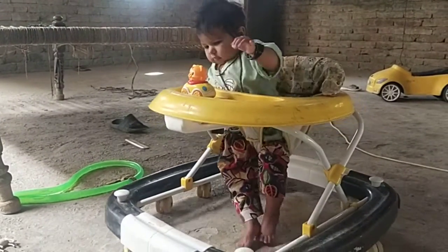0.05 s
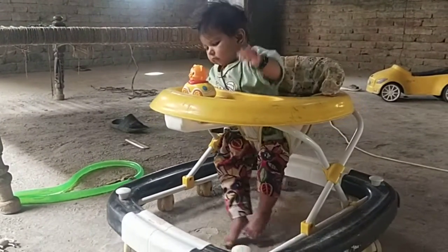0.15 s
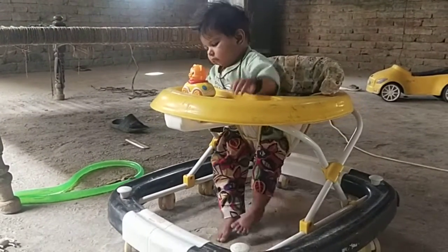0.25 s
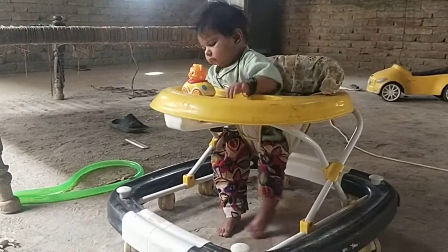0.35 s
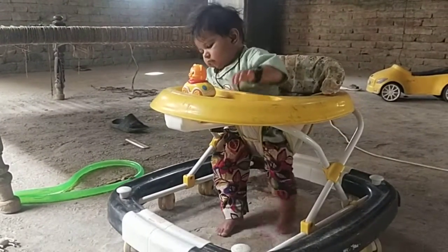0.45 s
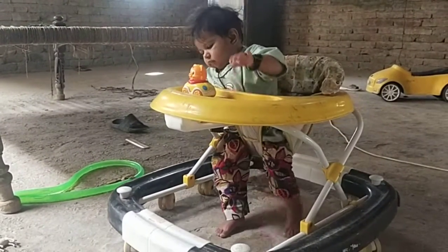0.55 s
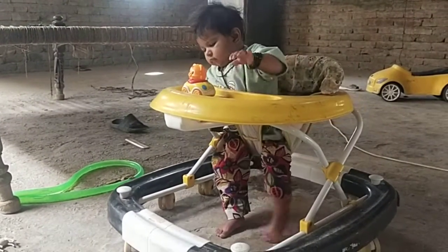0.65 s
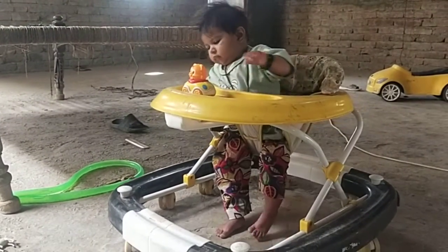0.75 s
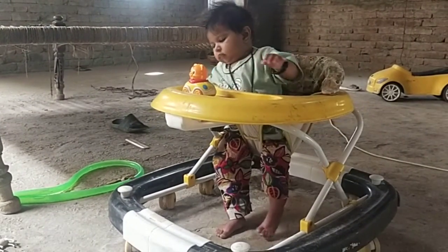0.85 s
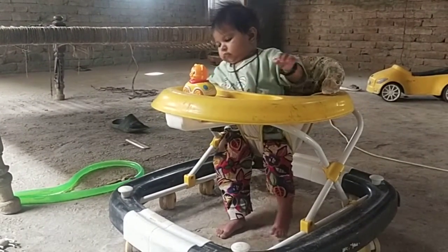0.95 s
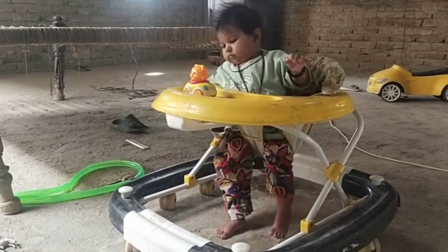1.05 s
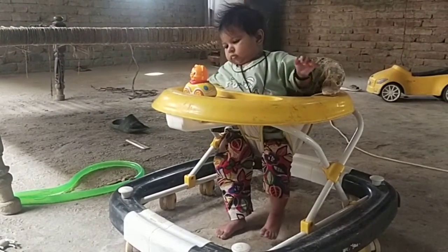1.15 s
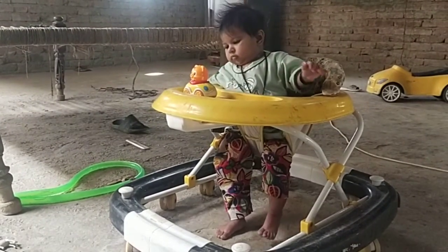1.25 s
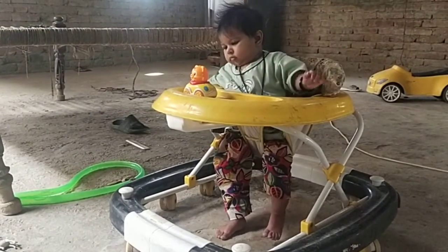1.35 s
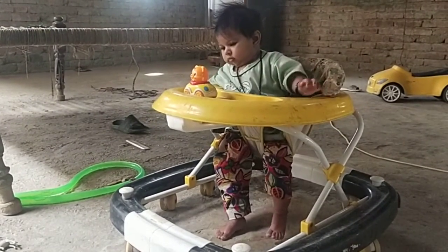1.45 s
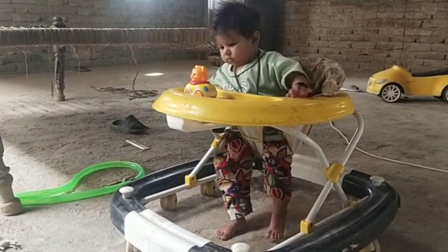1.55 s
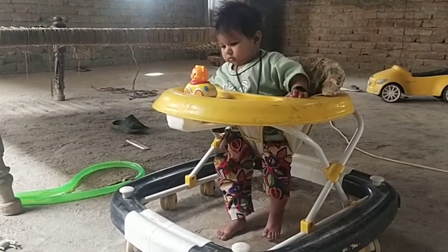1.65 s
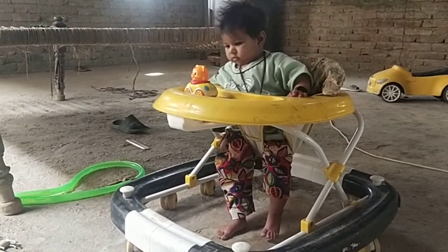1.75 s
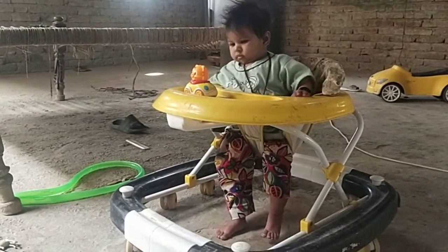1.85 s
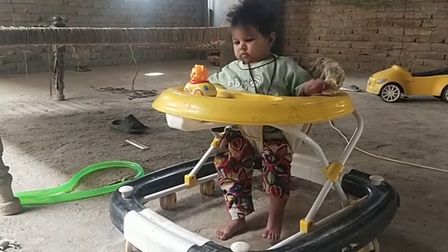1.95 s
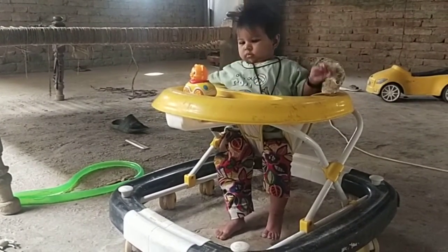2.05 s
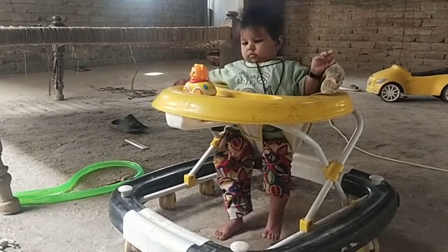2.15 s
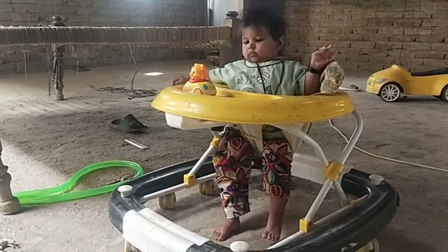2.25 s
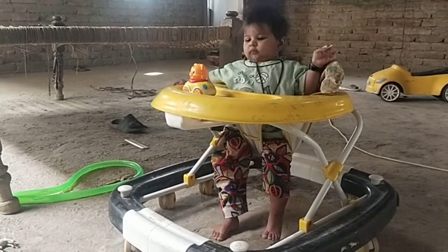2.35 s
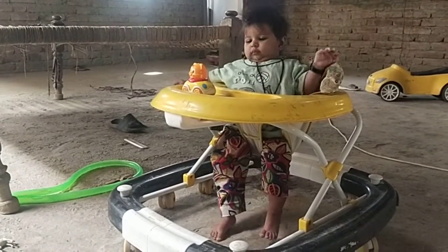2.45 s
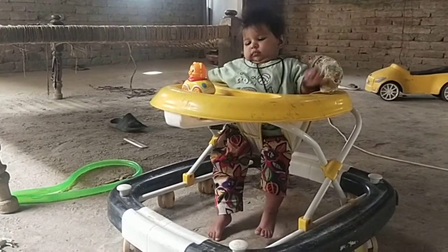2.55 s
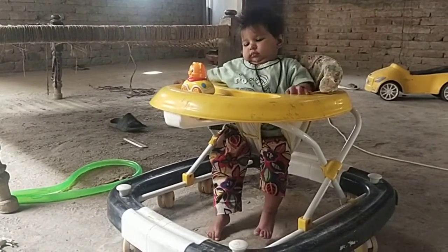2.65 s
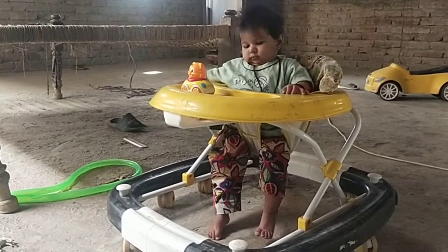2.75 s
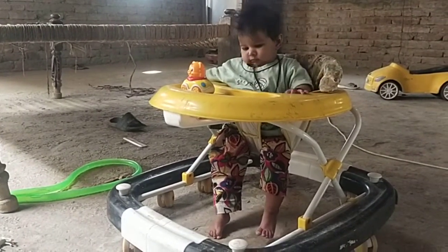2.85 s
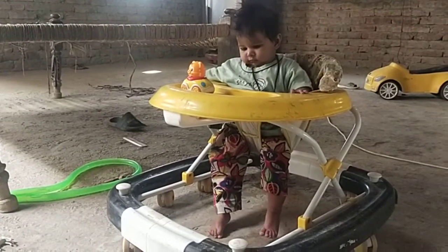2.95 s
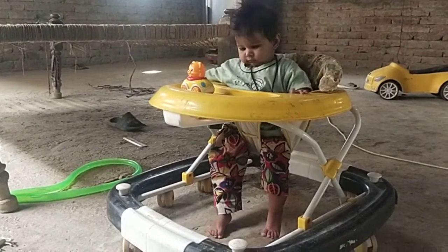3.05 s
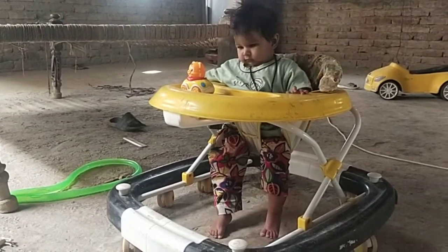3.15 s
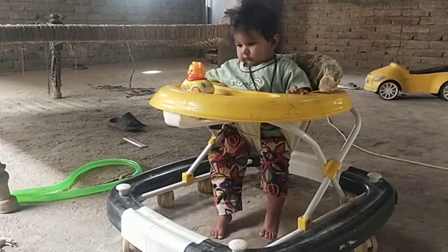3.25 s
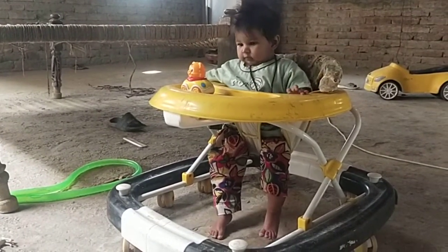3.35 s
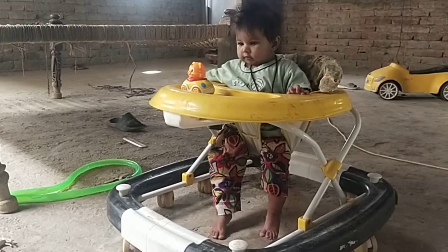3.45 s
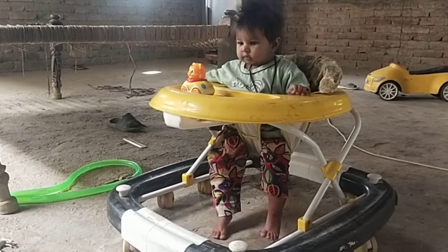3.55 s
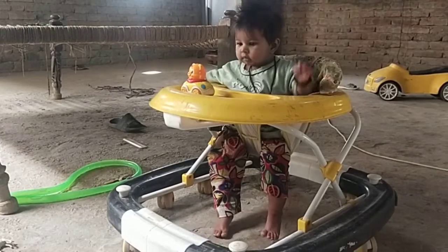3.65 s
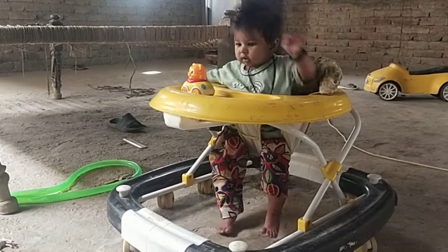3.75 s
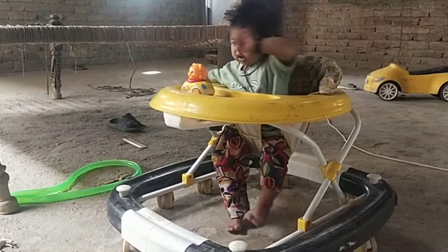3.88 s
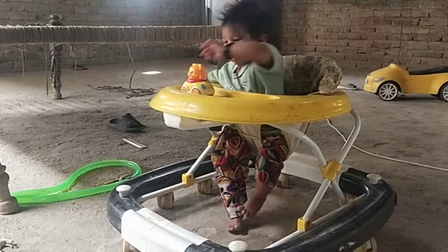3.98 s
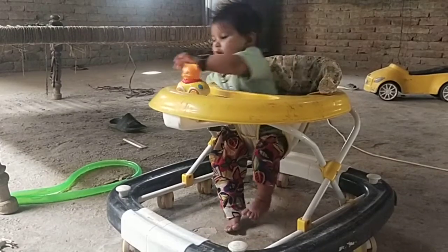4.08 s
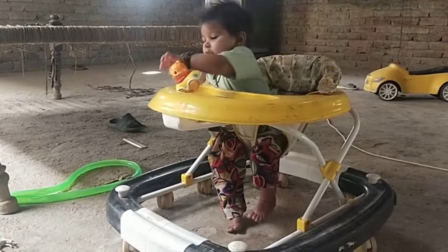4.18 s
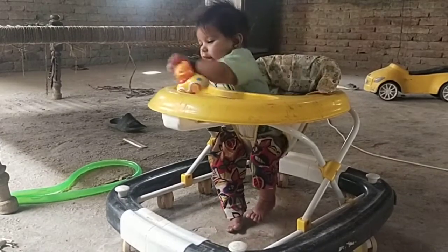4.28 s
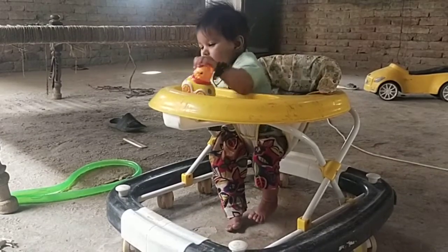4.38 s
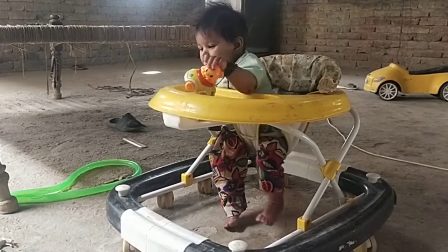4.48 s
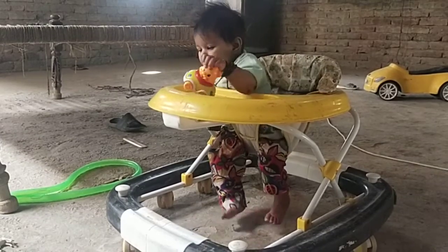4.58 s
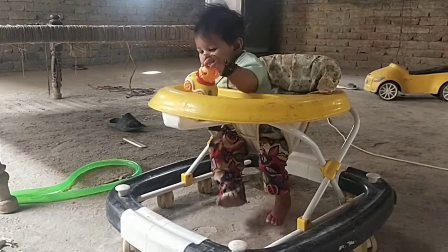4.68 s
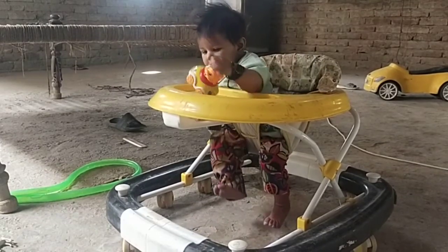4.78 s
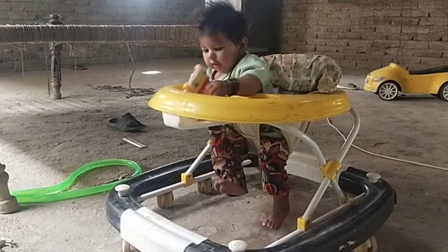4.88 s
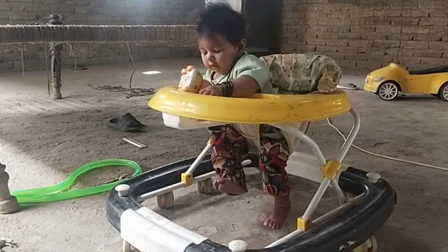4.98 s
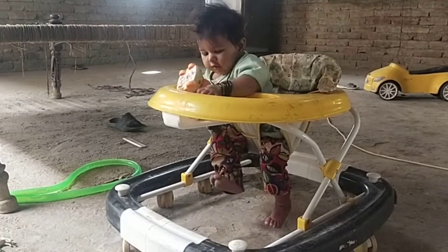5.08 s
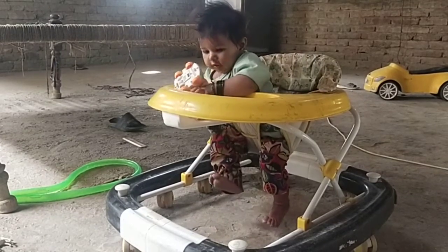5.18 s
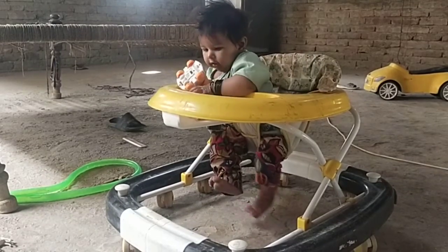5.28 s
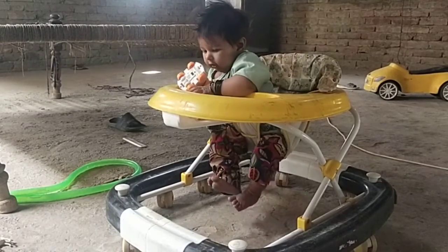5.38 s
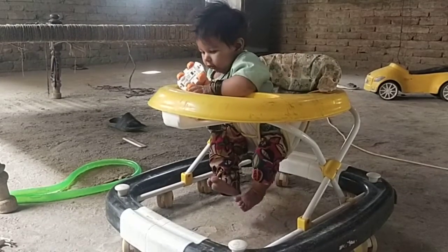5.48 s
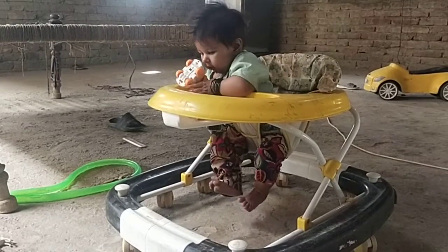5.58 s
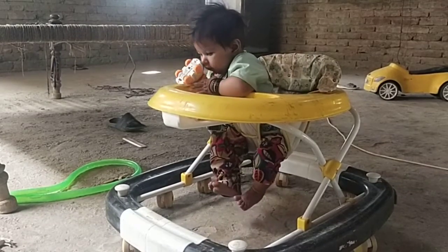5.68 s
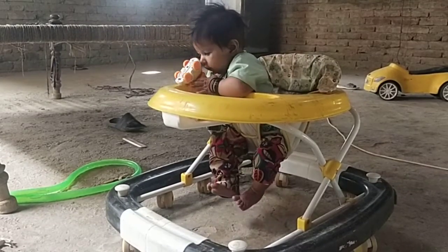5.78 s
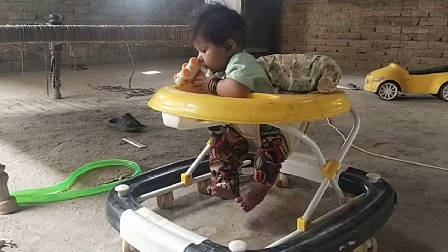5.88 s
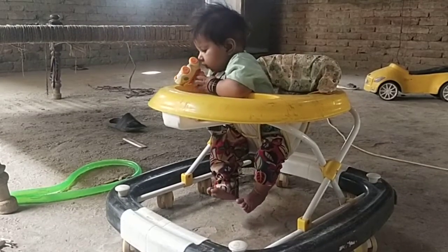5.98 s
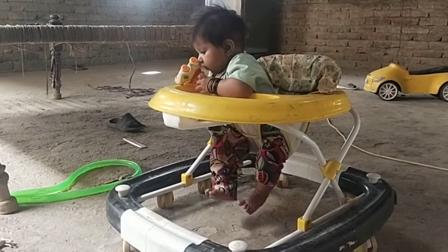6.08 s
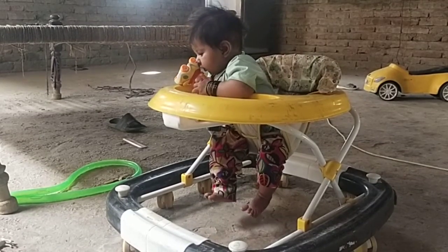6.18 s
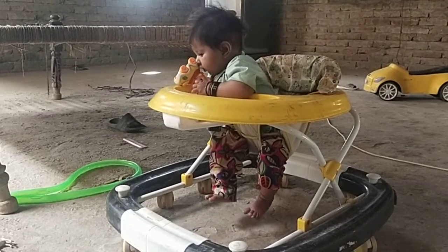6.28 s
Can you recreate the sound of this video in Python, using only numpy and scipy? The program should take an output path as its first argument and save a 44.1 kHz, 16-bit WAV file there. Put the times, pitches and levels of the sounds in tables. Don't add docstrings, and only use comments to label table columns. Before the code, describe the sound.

A small hollow plastic toy clacks and rattles on a hard plastic tray in an echoing brick hall, over faint machine drone and a distant bird trill.

```python
import sys
import numpy as np
from scipy import signal
from scipy.fft import rfft, irfft, next_fast_len
from scipy.io import wavfile
from scipy.ndimage import uniform_filter1d, map_coordinates

SR = 44100
rng = np.random.default_rng(int(sys.argv[2]) if len(sys.argv) > 2 else 0)


def field_ratio(decibels):
    return 10 ** (np.asarray(decibels, dtype=float) / 20)


def waveform_to_disk(signal):
    frames = np.transpose(np.atleast_2d(signal))
    scaled = np.clip(frames, -1, 1) * 32767
    samples = np.round(scaled).astype(np.int16)
    wavfile.write(sys.argv[1], SR, samples)


N = 278694
LEAD = SR // 4


def unit(x):
    return x / np.sqrt(np.mean(x ** 2) + 1e-20)


def along(points, hz):
    f, v = np.transpose(points)
    return np.interp(np.log(hz + 1), np.log(f + 1), v)


def filtered(x, response):
    m = next_fast_len(x.shape[-1] + 4096)
    spectrum = rfft(x, m) * response(np.fft.rfftfreq(m, 1 / SR))
    return irfft(spectrum, m)[..., :x.shape[-1]]


def modes(table, f):
    total = 0
    for k, (c, w, db) in enumerate(table):
        total = total + (-1) ** k * field_ratio(db) * 1j * f * w / (c * c - f * f + 1j * f * w + 1e-9)
    return total


def wander(length, step):
    return map_coordinates(rng.standard_normal(length // step + 4), [np.arange(length) / step])


def add(track, s, x):
    part = track[:, LEAD + round(s * SR):][:, :x.shape[1]]
    part += x[:, :part.shape[1]]


# pitch_hz, likeness [0 to 1]
ALIKE = [(60, 0.93), (350, 0.99), (700, 0.51), (1050, 0.48), (1400, 0.017), (5000, 0.13), (11000, 0.14)]


def field(length, gain):
    hz, t, z = signal.stft(rng.standard_normal((2, length)), SR, nperseg=256)
    turn = np.arccos(np.clip(along(ALIKE, hz), 0, 1))[:, None] / 2
    mid, side = z[0] * np.cos(turn), z[1] * np.sin(turn)
    shaped = np.array([mid + side, mid - side]) * gain(hz[:, None], t)
    return signal.istft(shaped, SR, nperseg=256)[1][:, :length]


# pitch_hz, t60_s
HALL = [(200, 1.), (530, 1), (1400, 0.89), (3700, 0.83), (10000, 0.46)]
# pitch_hz, level_db
SPREAD = [(150, 9), (230, 11), (320, 5), (600, 7), (1500, 4), (4000, -2.5), (8000, 1), (14000, -5.5)]


def hall(x, wet_db, size, blur=1, gap_s=0.0067, rise_s=0.0045):
    t = np.arange(size) / SR
    octaves = np.geomspace(40, SR / 2, 400)
    power = np.interp(octaves, np.fft.rfftfreq(2048, 1 / SR), np.abs(rfft(x, 2048)) ** 2)
    power = np.abs(uniform_filter1d(power, size=blur))
    tail = field(size, lambda hz, s: field_ratio(along(SPREAD, hz) - 60 * s / along(HALL, hz)))
    tail = tail * (1 - np.exp(-np.clip(t - gap_s, 0, 1) / rise_s))
    tail = tail * np.clip(8 - 8 * t * SR / size, 0, 1)
    tail = tail * field_ratio(3.5 * wander(size, 300) * np.exp(-t / .15))
    wet = filtered(tail / np.linalg.norm(tail[0]), lambda hz: np.sqrt(np.interp(hz, octaves, power)))
    return field_ratio(wet_db) * wet + np.pad(x, (0, size - len(x)))


# start_s, level_db (click peak), contact_ms
LANDINGS = [(4.152, -38, 3.1), (4.1572, -30, 2.8), (4.1798, -20.5, 2.76), (4.428, -13, 2.14),
            (4.8915, -34.5, 8.2), (5.261, -21, 1.63)]
SLAPS = [(4.9428, -18, 2.4), (4.9463, -15.5, 0.53), (4.952, -22, 2.9), (5.3413, -28, 2.4),
         (5.369, -41, 4.2), (5.38, -55, 0.82), (5.4142, -32.5, 5.9)]
THUDS = [
    (4.29, -38, 3.3),
    (4.391, -30.5, 5.4),
]
SCUFFS = [
    (4.283, -35, 3.5),
    (4.585, -36.5, 1.6),
    (5.243, -35, 2.1),
]
NICKS = [(5.012, -17.5, 3.5), (5.251, -29, 3.6), (5.2798, -25.5, 1.2), (5.325, -30, 1.2),
         (5.3527, -10, 0.48), (5.401, -38, 1.7), (5.439, -42, 0.78), (5.449, -32, 0.7)]
# tray_db, shell_db, edge_db relative to the click
FLAT, HOLLOW, THUD = (-11.5, -3, -5), (-7.5, 0, -4), (3.3, 4.7, -14)
SCUFF, RIM = (-5, -24, -6), (-24.5, -8, -5.5)


def contacts():
    ways = (LANDINGS, FLAT), (SLAPS, HOLLOW), (THUDS, THUD), (SCUFFS, SCUFF), (NICKS, RIM)
    return [(s, db, *colour, ms) for rows, colour in ways for s, db, ms in rows]


# pitch_hz, width_hz, level_db
TRAY = [(310, 72, -0.5), (433, 60, -0.5), (528, 170, -3.5), (633, 720, -2.5), (779, 52, -2)]
SHELL = [(1033, 710, -6.5), (1465, 1360, 3), (2062, 1230, -1)]
CLICK = [(2760, 1500, -4.5), (3160, 420, -8.5), (3720, 1470, -1.5), (4200, 87, -5), (4697, 400, -8.5)]
EDGE = [(5750, 5200, -11), (7126, 260, 6.5), (7970, 170, -3), (9020, 290, 0.5), (11040, 3700, -9),
        (14870, 1000, -37)]
# start_s, tilt_db per octave
ACROSS = [(4.15, -2), (4.3, -16.5), (4.43, 4.5), (4.95, -0.5), (5.26, -7), (5.4, 3)]


def struck_modes(table, tilt_db):
    return [(c * (1 + 0.013 * rng.standard_normal()), w,
             level + 0.2 * rng.standard_normal() + tilt_db * np.log2(c / 500))
            for c, w, level in table]


def struck_part(struck, press, chatter, rough):
    t = np.arange(len(press)) / SR
    pushes = 0
    for c, w, level in struck:
        swell = unit(signal.lfilter([1], [1, -np.exp(-np.pi * w / SR)], press))
        pushes = pushes + field_ratio(level) * np.sin(2 * np.pi * (c * t + rng.random())) * swell
    top_hz = 2.3 * struck[-1][0]
    grit = filtered(chatter, lambda f: modes(struck, f) / (1 + (f / top_hz) ** 4))
    ring = unit(pushes) + rough * unit(grit)
    return ring / np.abs(ring).max()


def knocks(track):
    lowest_hz = 226
    t = np.arange(2048) / SR
    for s, db, tray_db, shell_db, edge_db, ms in contacts():
        u = 1000 * t / np.clip(ms, .3, 8)
        press = u * np.exp(-u)
        spikes = field_ratio(3 * rng.standard_normal(len(t)))
        chatter = press * rng.standard_normal(len(t)) * spikes
        tray_tilt_db = np.interp(s, *np.transpose(ACROSS))
        parts = ((TRAY, tray_db, .3, tray_tilt_db), (SHELL, shell_db, .4, 0),
                 (CLICK, 1.5, .5, 0), (EDGE, edge_db, 1.5, 0))
        sound = 0
        for table, part_db, rough, tilt_db in parts:
            struck = struck_modes(table, tilt_db)
            sound = sound + field_ratio(db + part_db) * struck_part(struck, press, chatter, rough)
        sound = filtered(sound, lambda f: (1j * f / (lowest_hz + 1j * f)) ** 3)
        add(track, s, hall(sound, wet_db=-2.25, size=30000, blur=13))


# pitch_hz, width_hz, level_db
BEFORE = [(350, 250, -6), (800, 700, -6), (1610, 350, -0.5), (2056, 96, 4), (2700, 250, -11.5),
          (3920, 330, -12), (7000, 460, -18.5), (11300, 2500, -25)]


def earlier_knock(track):
    fading = field(SR, lambda hz, s: np.abs(modes(BEFORE, hz)) * field_ratio(-60 * s / (1.73 * along(HALL, hz))))
    add(track, 0, field_ratio(-53.0) * unit(fading))


def spots(track, table, ring_ms, snap_db, wet_db):
    t = np.arange(4000) / SR
    fade = field_ratio(-20 * 1000 * t / ring_ms) * (1 - np.exp(-t / (.07 * ring_ms / 1000)))
    for s, db, hz in table:
        snap_modes = [(hz, .6 * hz, 0), (11500, 6000, -7)]
        snap = filtered(rng.standard_normal(len(t)), lambda f: modes(snap_modes, f))
        tick = np.sin(2 * np.pi * hz * t) + field_ratio(snap_db) * unit(snap)
        add(track, s, hall(field_ratio(db + 2.5) * fade * tick, wet_db=wet_db, size=10000, blur=15))


# start_s, level_db (peak), pitch_hz
RINGS = [(4.1572, -21.5, 4370), (4.4285, -20, 1380), (4.182, -33, 1400), (4.9465, -17, 1440),
         (4.947, -30, 2190), (4.968, -18, 2130), (5.3533, -14, 3810), (5.38, -23.5, 1440),
         (5.4145, -22.5, 1330), (5.449, -26, 3660)]
# start_s, level_db (peak), pitch_hz
BOOMS = [(4.158, -36.5, 533), (4.18, -37, 270), (4.285, -38, 558), (4.43, -25.5, 659), (4.95, -31, 351),
         (5.012, -31.5, 549), (5.262, -37.5, 538)]
# start_s, level_db (peak), pitch_hz
TAPS = [(.22, -38, 2030), (2.27, -44, 1430), (2.292, -47.5, 4030), (2.30, -46, 1400), (2.659, -49, 1510),
        (4.836, -39.5, 1520), (4.8915, -25, 3920), (5.866, -40, 1330), (5.97, -45.5, 1260),
        (6.114, -46.5, 1250)]


def toy_and_tray_tones(track):
    spots(track, RINGS, ring_ms=5.3, snap_db=-25, wet_db=-12)
    spots(track, BOOMS, ring_ms=45, snap_db=-45, wet_db=-8)
    spots(track, TAPS, ring_ms=7, snap_db=-25, wet_db=-6)


# start_s, level_db (peak), pitch_hz, first_gap_s
RATTLES = [
    (1.279, -53, 10300, .019),
    (1.4677, -53, 10200, .0135),
]


def bounces():
    counts, gap_shrinks, losses_db = (7, 5), (.955, .86), (.6, 1.5)
    rows = []
    for (s, db, hz, gap), count, shrink, loss_db in zip(RATTLES, counts, gap_shrinks, losses_db):
        for k in range(count):
            rows.append((s + gap * (1 - shrink ** k) / (1 - shrink), db - loss_db * k, hz))
    return rows


# start_s, level_db (peak), pitch_hz
TICKS = [(0.1006, -50, 7140), (.173, -46, 7030), (.2904, -54.5, 6900), (.996, -57, 7800),
         (1.011, -61, 10100), (1.03, -62, 10500), (1.05, -64, 10200), (1.073, -54.5, 10200),
         (1.1593, -57, 10600), (2.269, -55, 10500), (4.288, -32, 5130), (4.293, -34, 7050),
         (4.587, -43, 4230), (5.713, -50, 6100), (5.864, -62, 10900), (5.871, -57, 10300)]
# start_s, level_db (peak), pitch_hz
CLACKS = [(.022, -45, 4000), (.222, -50, 5000), (1.558, -46, 4400), (5.627, -36, 3900), (5.637, -37, 4200),
          (5.648, -32, 3900), (5.704, -52, 5500), (5.722, -44, 5300), (5.98, -53, 5000)]
# start_s, level_db (peak), pitch_hz
DROP = [
    (2.291, -43, 7800),
    (2.296, -32, 7840),
    (2.302, -44, 7700),
    (2.308, -44, 7800),
]


def beads(track):
    spots(track, TICKS, ring_ms=2.6, snap_db=1.5, wet_db=-7)
    spots(track, CLACKS, ring_ms=2.2, snap_db=-12, wet_db=-5)
    spots(track, bounces(), ring_ms=2.6, snap_db=0, wet_db=-7)
    spots(track, DROP, ring_ms=2.6, snap_db=-10, wet_db=-13)


def notes():
    k = np.arange(10)
    start_s = 2.381 + .0868 * k - .046 * .55 ** k
    level_db = -65.5 + 1.05 * k
    pitch_hz = 6370 - 21 * (k - 4.1) ** 2
    return zip(start_s, level_db, pitch_hz)


def bird(track):
    u = np.linspace(-.44, .56, round(0.048 * SR))
    for s, db, hz in notes():
        pitch = hz * (1 - .95 * u ** 2)
        flutter = field_ratio(4 * map_coordinates(rng.standard_normal(16), [np.linspace(1, 14, len(u))]))
        swell = flutter * np.sin(np.pi * np.linspace(0, 1, len(u))) ** .9
        note = field_ratio(db - 2.5) * swell * np.sin(2 * np.pi * np.cumsum(pitch) / SR)
        add(track, s - .018, hall(note, wet_db=1.2, size=14000, blur=2))


def whine():
    start_s, length_s, pitch_hz, level_db = 3.62, .55, 2230, -70
    swell = np.sin(np.pi * np.clip((np.arange(N) / SR - start_s) / length_s, 0, 1))
    tone = filtered(rng.standard_normal(N), lambda f: modes([(pitch_hz, 70, 0)], f) ** 2)
    return field_ratio(level_db) * swell * unit(tone)


def patches(depth_db):
    def gain(hz, s):
        rough = rng.standard_normal((len(hz), len(s)))
        soft = uniform_filter1d(uniform_filter1d(rough, size=3, axis=0), size=30, axis=1)
        return field_ratio(depth_db * unit(soft))
    return gain


# pitch_hz, level_db per Hz
DRONE = [(20, -70), (38, -51), (48, -18), (65, -9), (95, -25), (125, -7.5), (220, -4), (250, -4), (340, 2),
         (420, -6.5), (640, -7.5), (860, -5.5), (1000, -8), (1300, -23.5), (2000, -74)]
HISS = [(590, -27), (1000, -4.5), (1250, -6.5), (1470, -7), (1810, -8), (2250, -5), (2500, -6.5),
        (4120, -16), (5760, -23.5), (7100, -22.5), (9170, -34.5), (12700, -34.5), (16000, -39)]
# pitch_hz, level_db, width_hz
HUM = [(88.8, -74, .2), (95.6, -65, .2), (102.3, -78, .2), (224.3, -69, .5), (823.8, -64.5, .1),
       (834, -66.5, .1), (893.3, -62.5, .1), (898.4, -71, .1), (2170, -79, 30), (7302, -89, 10)]


def machinery():
    drone = unit(filtered(field(N, patches(depth_db=0.5)), lambda f: field_ratio(along(DRONE, f))))
    hiss = unit(filtered(field(N, patches(depth_db=1.46)), lambda f: field_ratio(along(HISS, f))))
    air = field_ratio(-55) * drone + field_ratio(-58) * hiss
    for hz, db, width_hz in HUM:
        drift = np.cumsum(rng.standard_normal(N)) * np.sqrt(2 * np.pi * width_hz / SR)
        level = field_ratio(db + 3 + 1.2 * wander(N, 4000))
        air = air + level * np.sin(2 * np.pi * hz * np.arange(N) / SR + drift)
    return air


def scene():
    track = np.zeros((2, LEAD + N))
    for add_source in knocks, earlier_knock, toy_and_tray_tones, beads, bird:
        add_source(track)
    return track[:, LEAD:] + whine() + machinery()


def low_pass(x):
    return signal.sosfilt(signal.butter(12, 16100, fs=SR, output="sos"), x)


# pitch_hz, level_db (left minus right)
PORTS = [(100, -1), (700, 0.5), (1500, 0.5), (2400, 5), (3200, 6), (3900, 9), (5000, 12.5), (6000, 5.5),
         (6900, -4.5), (8000, -3.5), (10000, 4), (15000, 1)]
# pitch_hz, phase_rad
LATE = [(100, .05), (700, .4), (1400, 1), (3450, .4), (4480, 3.1), (6030, 7.2), (7750, 8.5), (9470, 11.9),
        (12900, 14.4)]


def record(dry):
    def ports(f):
        colour = field_ratio(along(PORTS, f) * np.array([[.5], [-.5]]))
        lag = np.exp(-1j * along(LATE, f) * np.array([[1], [0]]))
        return colour * lag * (f < 15750)
    return low_pass(filtered(dry, ports))


dry = scene()
out = record(dry)
waveform_to_disk(out)
```